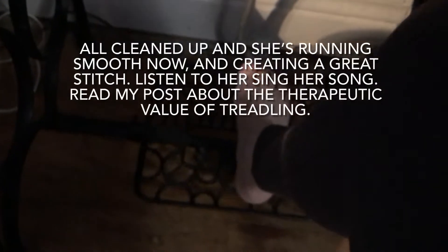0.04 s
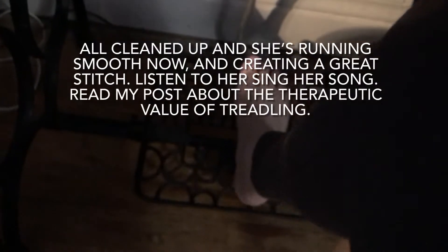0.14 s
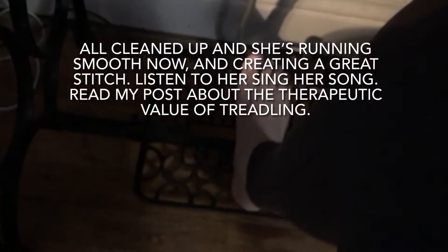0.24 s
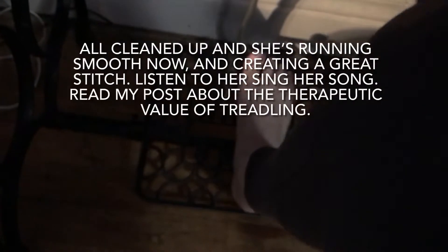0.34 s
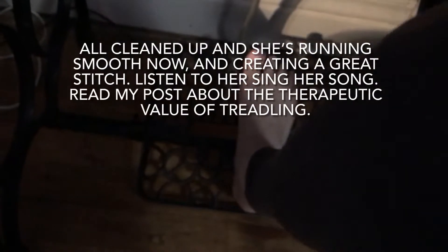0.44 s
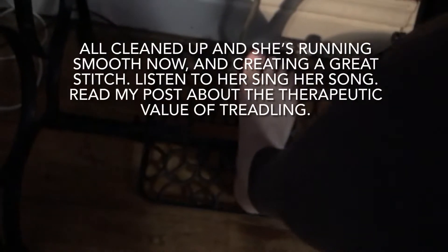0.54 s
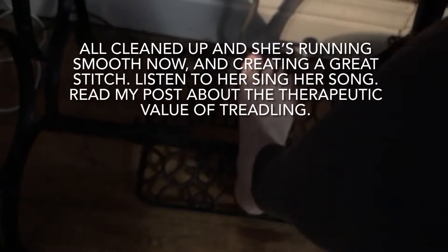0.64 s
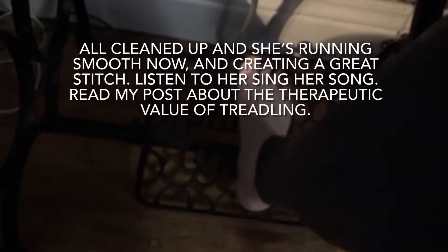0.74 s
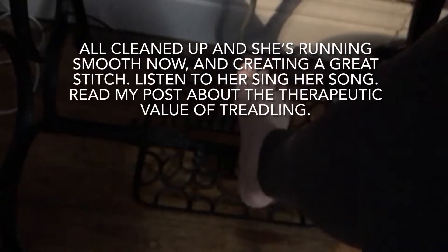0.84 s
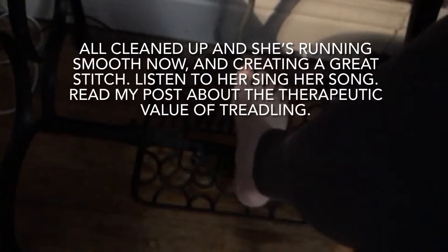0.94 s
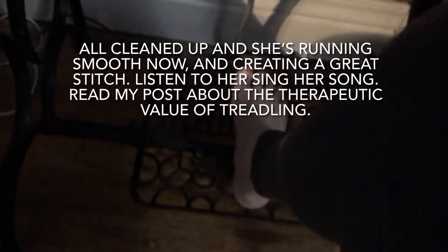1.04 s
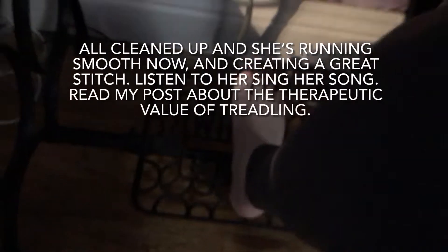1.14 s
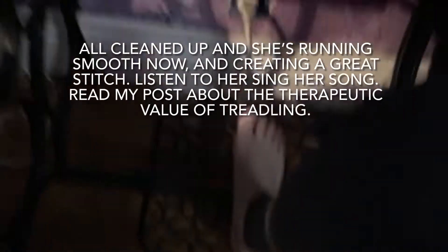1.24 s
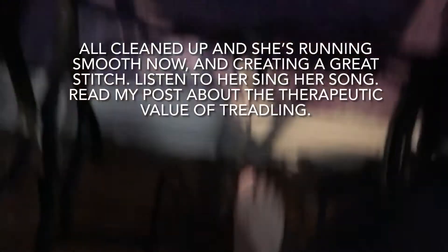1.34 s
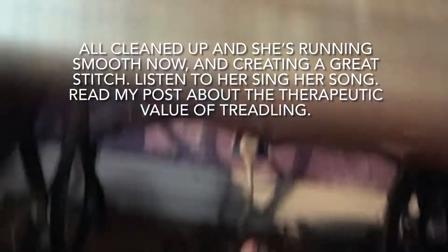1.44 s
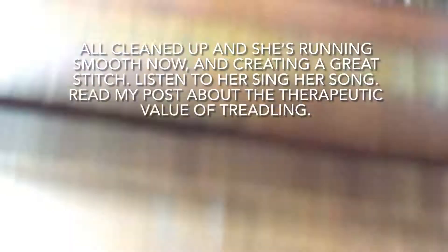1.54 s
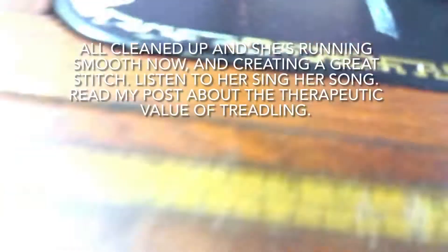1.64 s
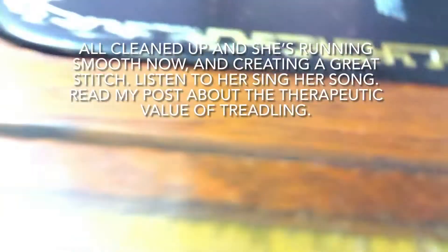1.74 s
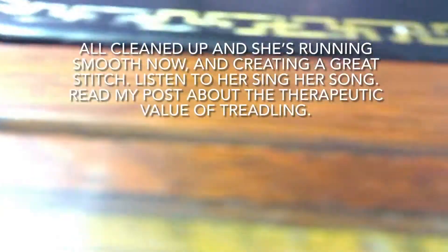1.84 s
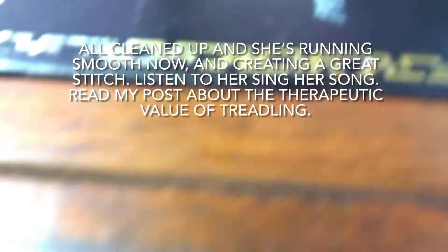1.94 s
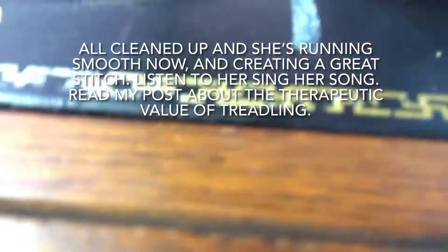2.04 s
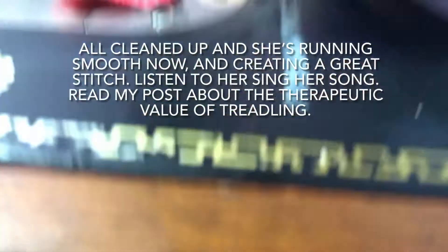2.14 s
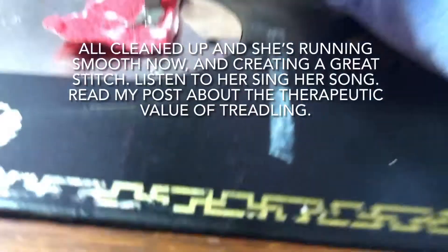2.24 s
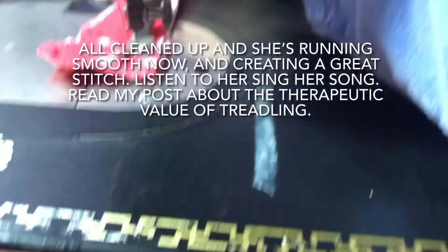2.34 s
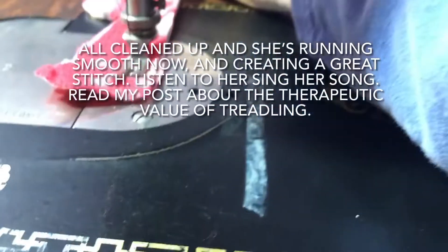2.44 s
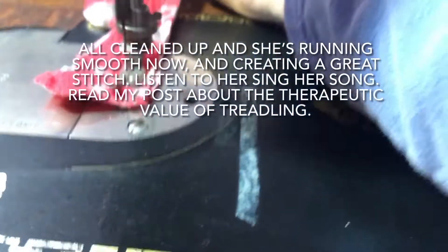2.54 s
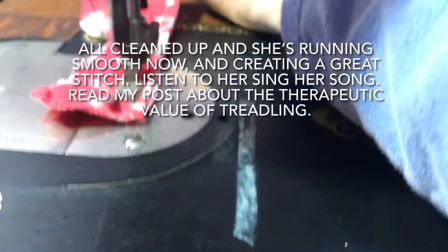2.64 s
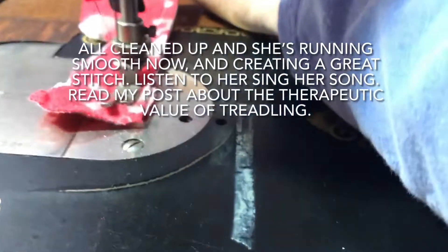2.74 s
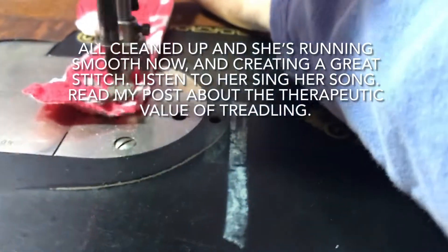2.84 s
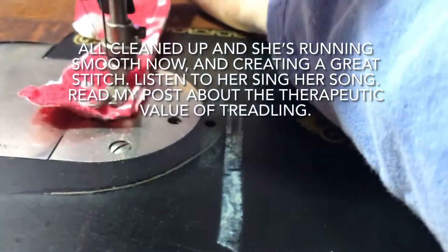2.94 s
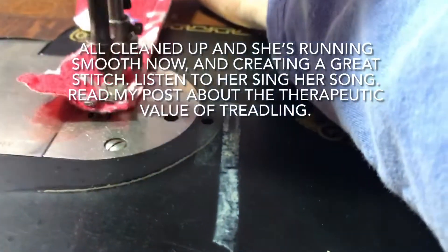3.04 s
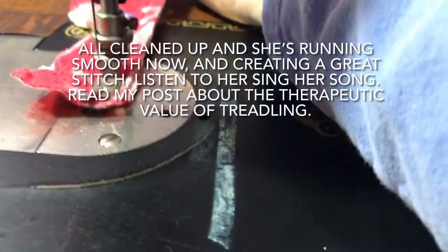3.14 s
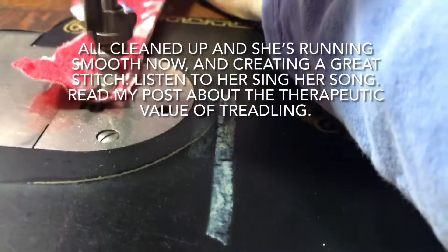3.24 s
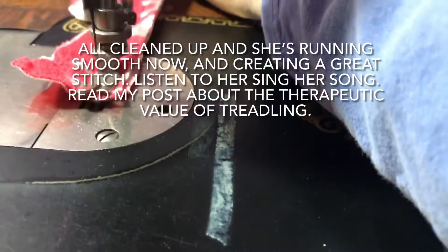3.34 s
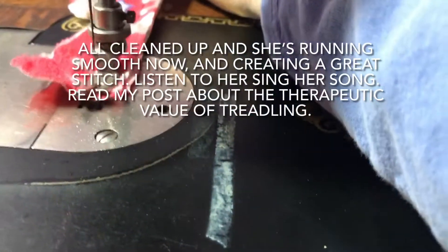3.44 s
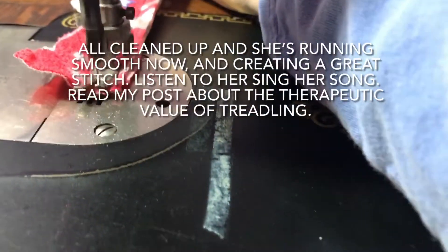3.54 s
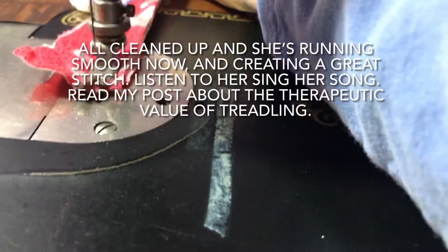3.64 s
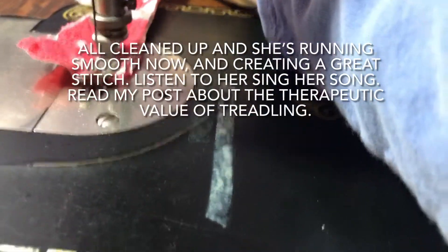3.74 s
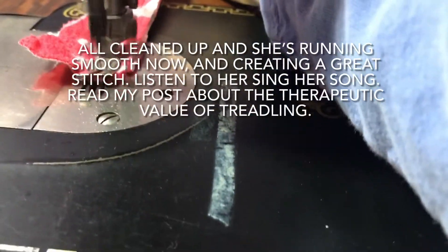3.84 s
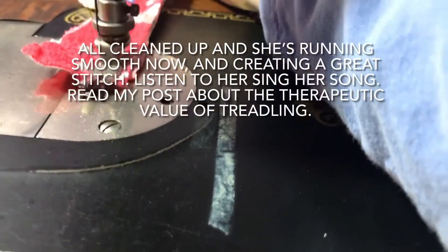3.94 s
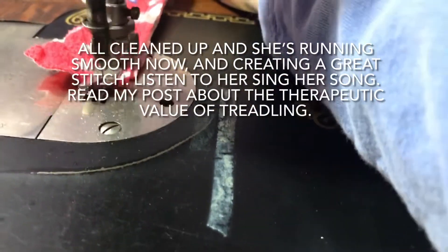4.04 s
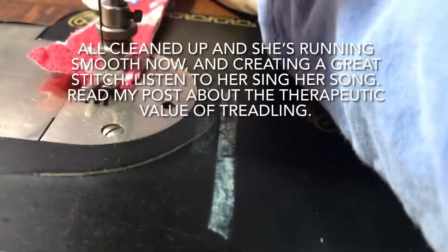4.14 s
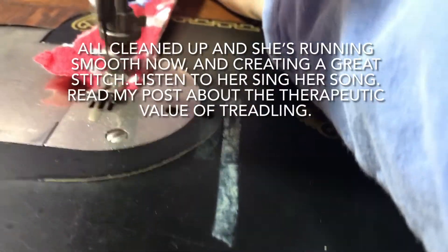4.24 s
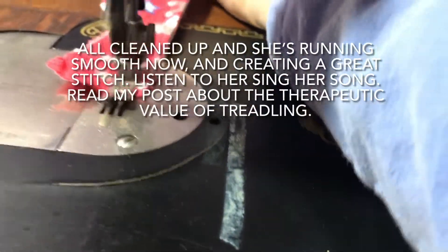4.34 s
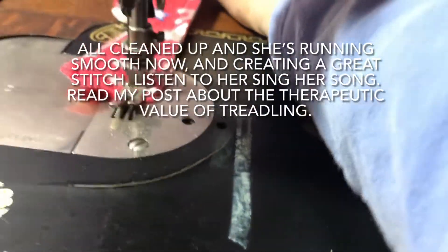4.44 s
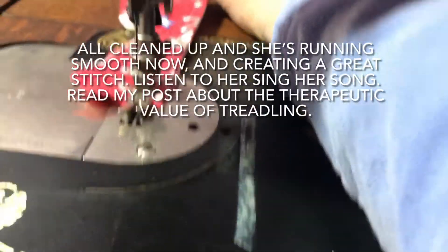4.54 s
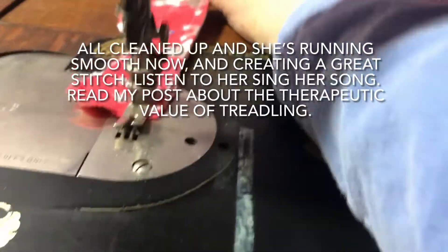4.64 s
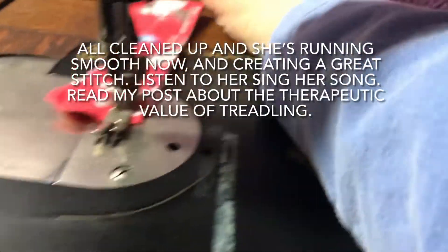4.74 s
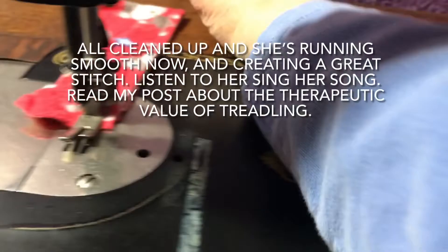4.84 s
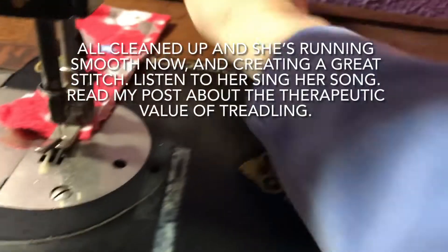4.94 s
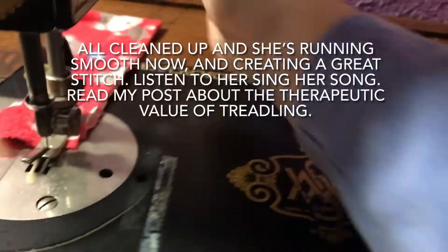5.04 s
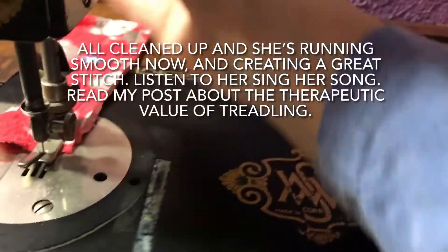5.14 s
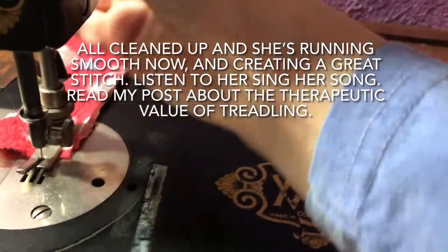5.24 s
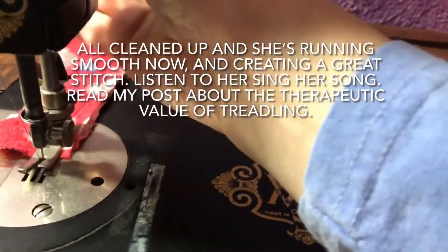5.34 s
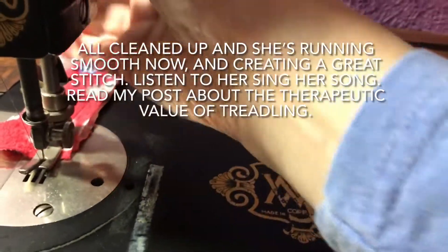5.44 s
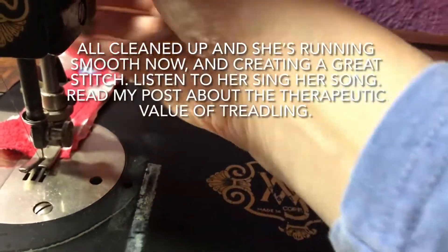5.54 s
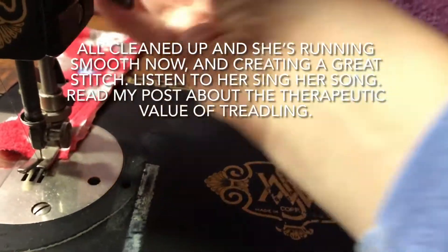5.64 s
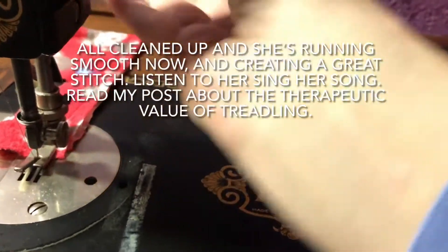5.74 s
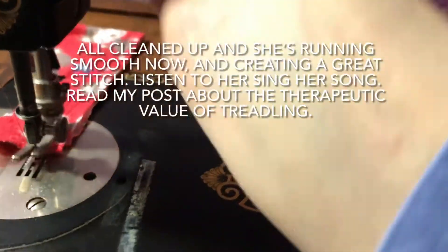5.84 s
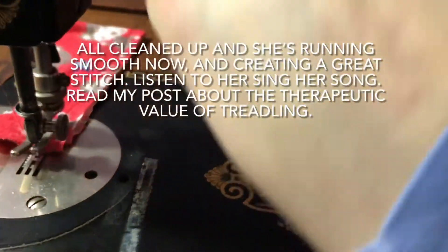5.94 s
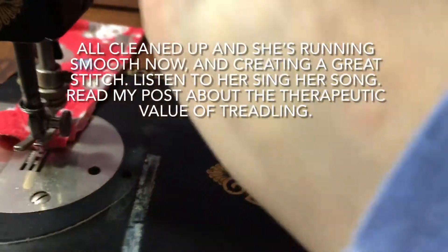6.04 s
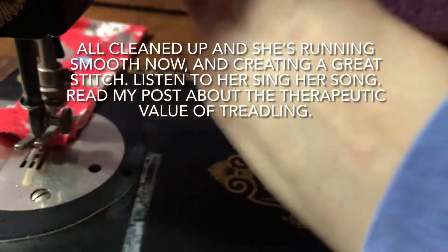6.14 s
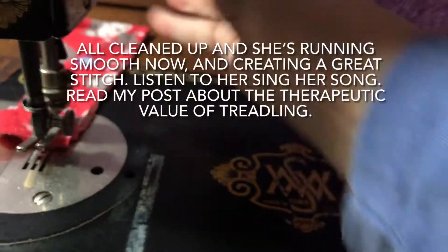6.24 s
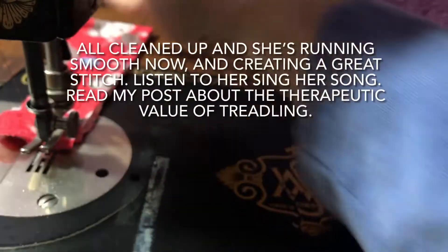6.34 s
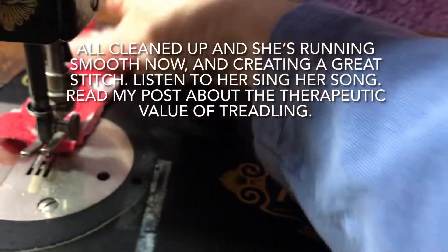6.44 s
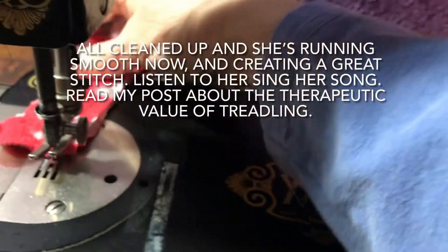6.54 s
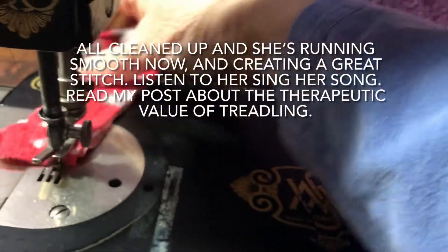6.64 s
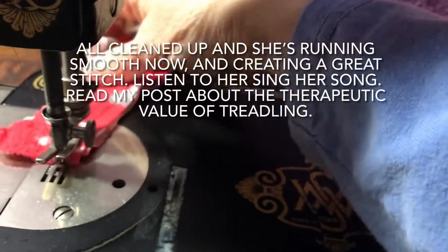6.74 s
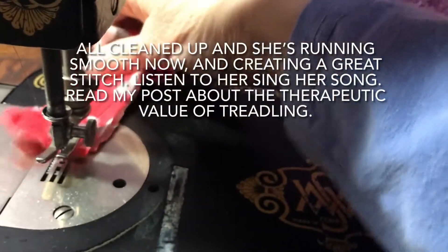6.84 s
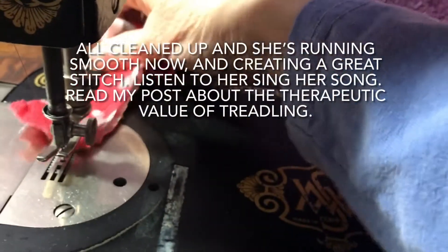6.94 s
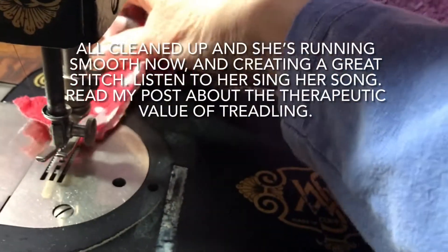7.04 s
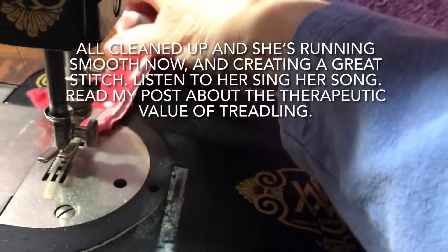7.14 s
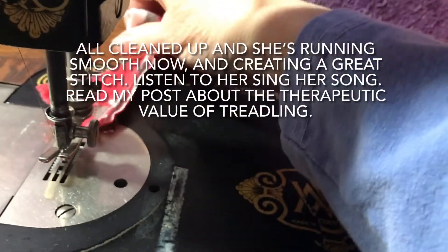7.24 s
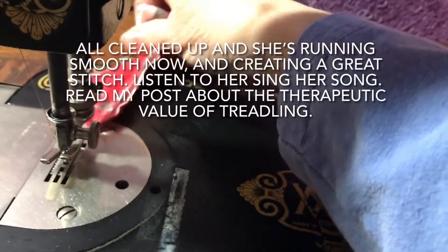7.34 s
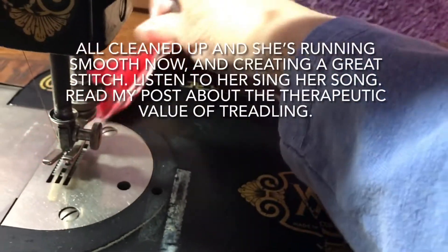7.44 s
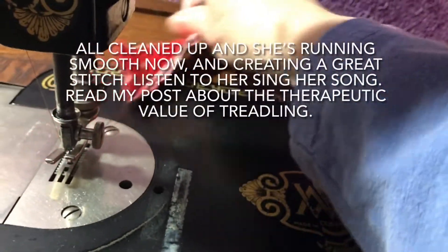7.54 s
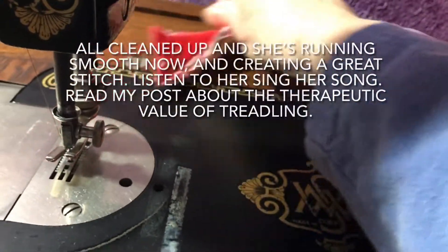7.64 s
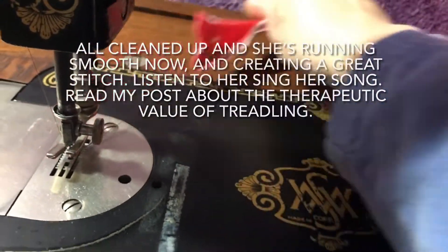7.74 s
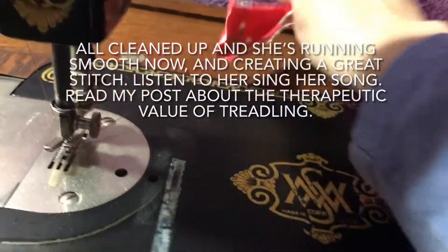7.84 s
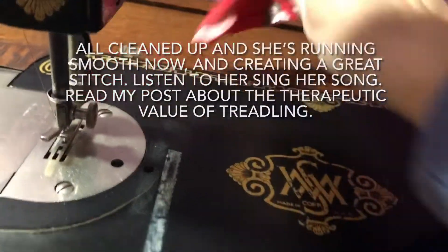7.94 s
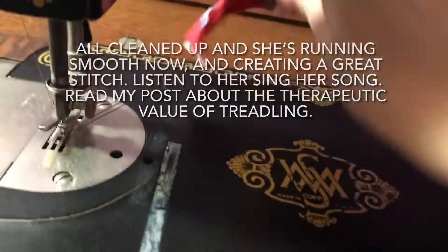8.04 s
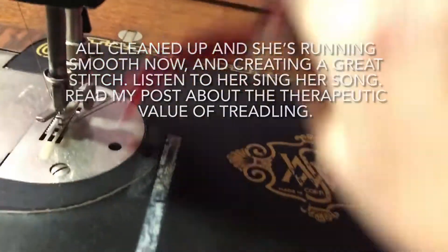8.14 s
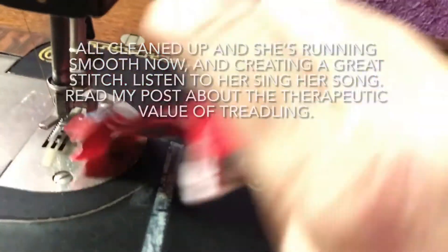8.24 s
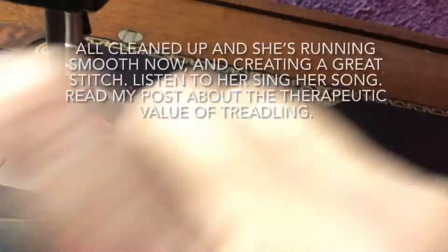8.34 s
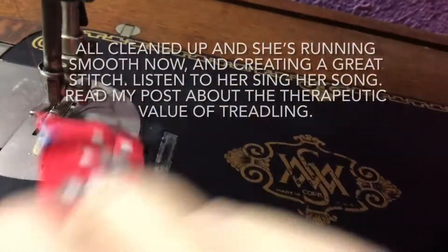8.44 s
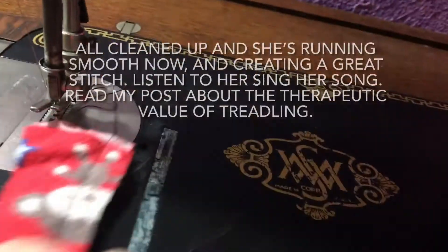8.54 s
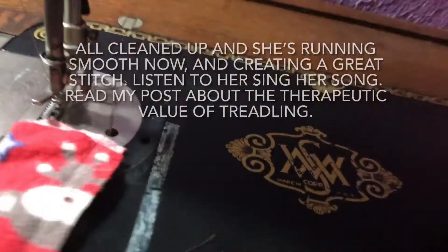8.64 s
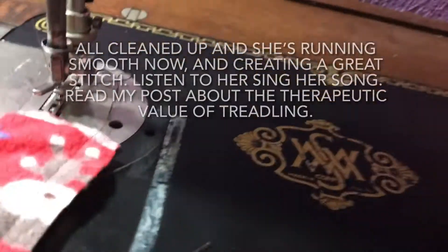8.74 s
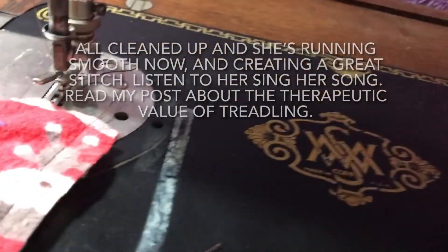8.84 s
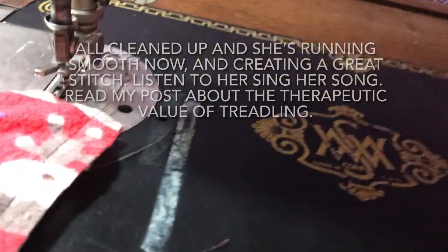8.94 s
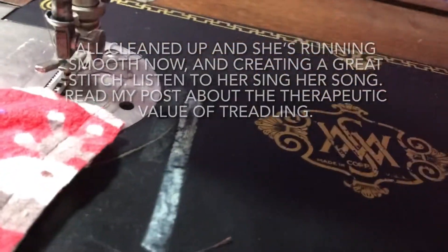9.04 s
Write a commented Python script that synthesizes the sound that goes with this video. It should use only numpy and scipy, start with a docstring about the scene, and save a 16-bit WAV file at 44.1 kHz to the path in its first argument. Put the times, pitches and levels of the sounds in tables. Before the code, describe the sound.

Close, handheld microphone moving from beneath a wooden table to above it. A mechanical sewing machine clatters in quick even cycles, with knocking wood, metallic clicks and sliding hiss, first muffled, then crisp and louder. After some four and a half seconds it coasts to rest with a soft thump. In the quiet, a low compressor hum remains; a lever snaps twice, fabric scrapes over metal, thread crackles and ticks, then only faint rubbing.

```python
"""A treadle sewing machine runs at about four stitches a second in a small room, over a compressor's hum.
The microphone is under the wooden table at first, then rises above it: each turn repeats clacks of steel
links and one rattle of the shuttle, while the table knocks and rumbles. The machine coasts to a stop, hands
draw cloth and ticking thread from under the foot, and the presser-foot lever snaps twice meanwhile.
Noise bursts and rubbing noise ring filtered bodies; sagging sines make the thuds, steady sines the hum."""
import sys
import numpy as np
from scipy import signal
from scipy.fft import rfft, irfft
from scipy.io import wavfile
from scipy.ndimage import uniform_filter1d

SR = 44100
rng = np.random.default_rng(int(sys.argv[2]) if len(sys.argv) > 2 else 0)


def waveform_to_disk(signal):
    """Save audio, clipped to [-1, 1], as 16-bit WAV at the path in sys.argv[1]."""
    frames = np.transpose(np.atleast_2d(signal))
    scaled = np.clip(frames, -1, 1) * 32767
    samples = np.round(scaled).astype(np.int16)
    wavfile.write(sys.argv[1], SR, samples)


N = 399987
T = np.arange(N) / SR  # s


def undb(db):
    """Decibels to gain."""
    return 10 ** (np.asarray(db) / 20)


def unit(x):
    """Scale to rms 1."""
    return x / np.sqrt(np.mean(x ** 2))


def add(out, s, sound):
    """Mix a sound in at time s, or at the start if s is negative."""
    i = max(int(s * SR), 0)
    out[i:i + len(sound)] += sound[:max(N - i, 0)]


def during(span, size=1000):
    """1 within a span of time, 0 outside, with soft edges."""
    inside = (T > span[0]) & (T < span[1])
    return uniform_filter1d(1. * inside, size=size)


def body(colour, modes=(), size=4096):
    """Causal (minimum-phase) impulse response of a broad colour with resonances standing out of it."""
    f = np.maximum(np.fft.rfftfreq(size, 1 / SR), 1)
    points = np.array(colour)
    db = np.interp(np.log(f), np.log(points[:, 0]), points[:, 1])
    for hz, width, lift_db in modes:
        peak = (undb(lift_db) ** 2 - 1) / (1 + (2 * (f - hz) / width) ** 2)
        db = db + 10 * np.log10(1 + peak)
    # folding the cepstrum onto positive times makes the response causal
    cepstrum = irfft(np.log(undb(db)))
    cepstrum[1:size // 2] *= 2
    cepstrum[size // 2 + 1:] = 0
    return irfft(np.exp(rfft(cepstrum)))[:size // 2]


def through(x, response):
    """Let a signal ring a body."""
    return signal.fftconvolve(x, response)[:len(x)]


def contact(response, lift_db=11, count=4):
    """Parts never meet twice at the same spot, so each contact brings out a few resonances of its own."""
    pitches = np.geomspace(1100, 15000, 200)[rng.integers(200, size=count)]
    modes = [(hz, hz / 14, lift_db) for hz in pitches]
    spot = body([(100, 0), (16000, 0)], modes, size=256)
    return np.convolve(response, spot)


def blow(response, rise_s, decay_s, rattle_db, rattle_s, grain_db=4, size=4096, count=176):
    """A burst of tiny contacts with an uneven rattle of loose parts; its loudest 4 ms have rms 1."""
    t = np.arange(size) / SR
    bounces = undb(grain_db * np.repeat(rng.standard_normal(size // 32), 32))
    rattle = undb(rattle_db) * bounces * np.exp(-t / rattle_s)
    force = (1 - np.exp(-(t / rise_s) ** 2)) * (np.exp(-t / decay_s) + rattle)
    y = through(force * rng.standard_normal(size), response)
    return y / np.sqrt(uniform_filter1d(y ** 2, count).max())


def thud(hz, rise_s, decay_s, drop, overtone_db=-60, size=12000):
    """A soft push on one damped mode, whose pitch sags as the contact relaxes; rubbing adds overtones."""
    t = np.arange(size) / SR
    swell = (1 - np.exp(-(t / rise_s) ** 2)) * np.exp(-t / decay_s)
    swell = swell / swell.max()
    sagging_hz = hz * (1 + drop * (np.exp(-t / decay_s / 2) - .5))
    phase = 2 * np.pi * np.cumsum(sagging_hz) / SR
    overtones = np.sin(2 * phase) + np.sin(3 * phase) / 2
    return swell * np.sin(phase) + undb(overtone_db) * swell ** 2 * overtones


def friction(response, grain_db, grain_hz):
    """Rubbing: noise whose strength wanders from one catch to the next, ringing a body."""
    catches = np.interp(T * grain_hz, np.arange(N), rng.standard_normal(N))
    return unit(through(rng.standard_normal(N) * undb(grain_db * catches), response))


def crackle(response, rate_hz, spread_db, size=300):
    """Tiny catches of very uneven size, each a brief scratch that rings a body."""
    hits = (rng.random(N) < rate_hz / SR) * rng.choice([-1, 1], N)
    catches = hits * undb(spread_db * np.minimum(rng.standard_normal(N), 2))
    scratch = rng.standard_normal(size) * np.exp(-np.arange(size) / SR / .0014)
    return unit(through(catches, np.convolve(response, scratch)))


# one turn of the handwheel per stitch; the pace swings with the treadle, the last turn is left unfinished:
# (shuttle swing [s], feed drop [s], shuttle relative level [dB], force on the steel [dB],
#  force on the table [dB], groan relative level [dB])
STITCHES = [(-.08, 0.09, -32, 4, 2, -32.5), (0.152, 0.3267, -25, -1.5, 1.5, -38),
            (.3806, 0.5752, -26, 1, 0.5, -32), (0.643, 0.8326, -30.5, 1, 0.5, -49),
            (.874, 1.013, -26.5, 2.5, 3, -34), (1.06, 1.2232, -27, -1.5, 1, -38),
            (1.277, 1.459, -27, 1.5, 1.5, -39), (1.5254, 1.741, -28.5, 0, -1.5, -50),
            (1.7958, 1.952, -18.5, -0.5, 2.5, -24.5), (1.9945, 2.1464, -21.5, 1, 3.5, -23.5),
            (2.2053, 2.38, -20, 0, 0.5, -26), (2.4347, 2.643, -22.5, 0, 0, -53),
            (2.7078, 2.8888, -26.5, -0.5, -1, -26.5), (2.9379, 3.0884, -21.5, -0.5, 1, -22),
            (3.1446, 3.3283, -21, -2.5, -2, -46), (3.383, 3.578, -20.5, -2, 0.5, -24.5),
            (3.6616, 3.8663, -29, -0.5, 0.5, -49), (3.918, 4.0885, -20.5, -1, -1, -27),
            (4.146, 4.347, -24.5, -2, -1, -35.5), (4.438, 4.858, -30.5, -12, -9.5, -50)]
FEED_TURN = .76  # share of the turn


def turn_marks():
    """Times and handwheel angles (in turns) of every shuttle swing and feed drop."""
    times = [s for row in STITCHES for s in row[:2]]
    turns = [k + share for k in range(len(STITCHES)) for share in (0, FEED_TURN)]
    return times, turns


def time_of(turn):
    """The moment at which the handwheel reaches an angle."""
    times, turns = turn_marks()
    return np.interp(turn, turns, times)


def near_turn(turn, share, width):
    """A bell that reaches 1 whenever the handwheel passes a given share of its turn."""
    return np.exp(-(((turn - share + .5) % 1 - .5) / width) ** 2)


# the microphone starts under the table and rises above it: (from [s], to [s])
RISE_S = (1.32, 1.695)
# while it is below, the table top screens clacks, chatter, hiss and rub, and the frame's rumble is nearer [dB]
SCREEN_STEEL_DB, SCREEN_TABLE_DB, SCREEN_TICK_DB, SCREEN_HISS_DB = -11.5, -4.5, -15.5, -3.5
SCREEN_RUB_DB, NEAR_RUMBLE_DB = -20, 1.5


def under_table(s):
    """1 while the microphone is under the table, 0 once it is above."""
    return np.interp(s, RISE_S, (1, 0))


# colour of the soft room noise: (frequency [Hz], relative level [dB])
AIR = [(25, -26), (42, -2), (60, -18), (92, -19.5), (134, -9.5), (175, -21.5), (217, -18.5), (363, -8),
       (451, -23), (775, -26.5), (1040, -30), (2000, -32.5), (4870, -45), (16000, -42)]
AIR_DB = -56.5  # dB rms
SHAFT_HZ = 45.12
# compressor orders: (multiple of the shaft rate [1], level [dB rms])
COMPRESSOR = [(1, -54), (2, -73), (3, -65), (4, -76), (5, -61), (6, -67.5), (7, -70), (8, -62), (9, -71.5),
              (11, -74.5), (12, -77.5), (15, -75)]
# mains hum: (frequency [Hz], level [dB rms])
MAINS = [(60, -71), (120, -69), (240, -74), (300, -70)]


def background():
    """A compressor's slightly wavering shaft orders beat against mains hum, over soft room noise."""
    waver = np.interp(T, np.arange(12), rng.standard_normal(12))
    turns = np.cumsum(SHAFT_HZ + .04 * waver) / SR
    lines = [(k * turns, db) for k, db in COMPRESSOR] + [(hz * T, db) for hz, db in MAINS]
    hum = 0
    for cycles, db in lines:
        hum = hum + np.sqrt(2) * undb(db) * np.sin(2 * np.pi * (cycles + rng.random()))
    return hum + undb(AIR_DB) * unit(through(rng.standard_normal(N), body(AIR)))


# resonances that stand out of the machine's body: (frequency [Hz], width [Hz], lift [dB])
MACHINE_MODES = [(331.7, 24, 8), (603, 25, 5), (707, 22, 7), (1220, 78, 3), (1615, 60.6, 6), (2785, 130, 8),
                 (3290, 130, 5), (4200, 520, 2), (6080, 320, 5.5), (6870, 240, 1.5), (7960, 205, 3.5),
                 (8685, 300, 2.5), (9500, 370, 2.5), (11170, 150, 1), (11600, 400, 6.5)]
# colours of rumbling frame, table top, sliding metal and rubbing rod: (frequency [Hz], relative level [dB])
RUMBLE = [(30, -21), (70, -5), (130, -0.5), (190, 0), (320, -1.5), (420, -6.5), (600, -11), (1500, -41)]
TABLE = [(100, -15.5), (300, -21), (470, -3), (650, 3.5), (950, -4.5), (1300, -4), (1800, -17), (2600, -19),
         (6000, -57)]
SLIDE = [(700, -14), (1800, -3), (3000, 2.5), (5000, -5.5), (9000, -6.5), (16000, -26)]
RUB = [(200, -51), (480, -13), (680, -3), (900, -14), (2500, -45)]
# wooden resonances of the drive rod: (frequency [Hz], width [Hz], lift [dB])
RUB_MODES = [(592, 35, 18), (699, 48, 6.5)]
# relative levels [dB]; the jiggle of small parts is relative to sliding metal of rms 1, before screening
RUMBLE_DB, CHATTER_DB, RUB_DB, HISS_DB, JIGGLE_DB = -53, -49, -47.5, -59.5, -57
# the load swells once a turn: share of the turn, width [turns], lift [dB]
LOAD_TURN, LOAD_WIDTH, LOAD_DB = 0.6, 0.25, 5
# the shuttle slides in its race after each swing, raising hiss and jiggle: share, width [turns], lift [dB]
RACE_TURN, RACE_WIDTH, RACE_DB = 0.21, 0.24, 3.5
# the feet stop pushing and the gear dies away: from [s], fall [dB per s]
COAST_S, COAST_DB_PER_S = 4.2, 25


def gear():
    """Frame rumble, bearing chatter and rod rub follow the load; slides hiss and small parts jiggle."""
    turn, under = np.interp(T, *turn_marks()), under_table(T)
    table_force_db = [row[4] for row in STITCHES]
    force = undb(np.interp(turn, np.arange(len(STITCHES)) + .5, table_force_db))
    load = near_turn(turn, LOAD_TURN, LOAD_WIDTH)
    race = near_turn(turn, RACE_TURN, RACE_WIDTH)
    running = undb(-COAST_DB_PER_S * np.maximum(T - COAST_S, 0))

    rumble = friction(body(RUMBLE, MACHINE_MODES), grain_db=4, grain_hz=60.5)
    rumble = undb(RUMBLE_DB + NEAR_RUMBLE_DB * under) * rumble
    chatter = friction(body(TABLE, MACHINE_MODES), grain_db=2.5, grain_hz=202.2)
    chatter = undb(CHATTER_DB + SCREEN_TABLE_DB * under) * chatter
    rub = friction(body(RUB, RUB_MODES), grain_db=2.5, grain_hz=49.7)
    rub = undb(RUB_DB + SCREEN_RUB_DB * under) * rub
    loaded = force * (undb(LOAD_DB * load) * (rumble + chatter) + load * rub)

    slides = body(SLIDE, MACHINE_MODES)
    hiss = undb(HISS_DB) * friction(slides, grain_db=2.0, grain_hz=316)
    # six loose parts, each with its own ring
    jiggle = unit(sum(crackle(contact(slides), rate_hz=28, spread_db=3.5) for _ in range(6)))
    sliding = hiss + undb(JIGGLE_DB) * jiggle
    return running * (loaded + undb(SCREEN_HISS_DB * under + RACE_DB * race) * sliding)


# needle bar, take-up, feed and links clack at the same points of every turn: (share of the turn [1],
# steel ring relative level [dB], table knock relative level [dB], bright tick relative level [dB])
CLACKS = [(.128, -29, -31, -40), (.232, -30, -32, -32), (.298, -25, -33, -39.5), (.41, -31, -36.5, -40),
          (.59, -30, -38.5, -39), (.76, -27.5, -37, -31.5), (.905, -27.5, -39, -46.5)]
# scatter of a clack from turn to turn, in time [s] and strength [dB]; no clack falls after the stop [s]
PLAY_S, PLAY_DB, STOP_S = .002, 1.24, 4.63


def strokes():
    """The clacks of all turns, a little early or late, weak or strong: (s, steel dB, table dB, tick dB)."""
    rows = []
    for k, (_, _, _, steel_force_db, table_force_db, _) in enumerate(STITCHES):
        force_db = np.array([steel_force_db, table_force_db, steel_force_db])
        for share, *levels_db in CLACKS:
            chance = rng.standard_normal(4)
            # the feed drop keeps its exact time
            s = time_of(k + share) + PLAY_S * chance[0] * (share != FEED_TURN)
            screen_db = under_table(s) * np.array([SCREEN_STEEL_DB, SCREEN_TABLE_DB, SCREEN_TICK_DB])
            if 0 < s < STOP_S:
                rows.append((s, *(np.array(levels_db) + force_db + screen_db + PLAY_DB * chance[1:])))
    return rows


# now and then the slack in the drive is taken up with a jerk; the row at 4.565 s is instead a clack of # the
# slowing last turn: (time [s], steel ring relative level [dB], table knock relative level [dB], # bright tick
# relative level [dB])
JERKS = [(0.76, -27, -25, -43), (1.6563, -20.5, -21.5, -29.5), (1.9071, -24, -21.5, -23),
         (2.0172, -21.5, -30.5, -39), (2.548, -21, -22, -31.5), (3.2794, -26, -28, -33.5),
         (3.7857, -19.5, -20.5, -24.5), (4.0464, -24.5, -37, -31), (4.565, -32, -46, -34),
         (4.6864, -25, -32, -34)]
# colours of the steel head and of the contact's tick: (frequency [Hz], relative level [dB])
STEEL = [(600, -35.5), (1400, -1), (2100, -8), (3000, 2), (4300, 1), (5500, -11.5), (9000, -22)]
TICK = [(1500, -34.5), (4000, -14), (5500, -3), (8000, 1), (10500, -1.5), (13500, -0.5), (16000, -5)]


def linkage():
    """Each clack or jerk ticks at the contact, rings the steel head and knocks the table top."""
    out = np.zeros(N)
    steel, table, tick = (body(c, MACHINE_MODES) for c in (STEEL, TABLE, TICK))
    for s, steel_db, table_db, tick_db in JERKS + strokes():
        click = blow(contact(tick, lift_db=9), rise_s=0.0014, decay_s=0.0032, rattle_db=-12, rattle_s=0.015)
        ring = blow(contact(steel, lift_db=8), rise_s=0.00031, decay_s=0.0088,
                    rattle_db=16.0, rattle_s=0.0072)
        knock = blow(contact(table), rise_s=0.002, decay_s=0.0079, rattle_db=-19.5, rattle_s=0.038)
        add(out, s, undb(tick_db - 3.5) * click)
        add(out, s, undb(steel_db - 11.5) * ring)
        add(out, s, undb(table_db - 4.0) * knock)
    return out


# the wooden drive rod groans once a turn: share of the turn, nominal pitch [Hz], relative pitch scatter
GROAN_TURN, GROAN_HZ, GROAN_SCATTER = .42, 693, 0.01
# dull bumps and knocks of treadle and cabinet: (time [s], relative level [dB], nominal pitch [Hz])
BUMPS = [(0.047, -20.5, 383), (0.06, -28, 85), (0.444, -20.5, 384), (0.765, -21, 324), (1.1, -24.5, 344),
         (1.384, -24, 317), (1.44, -20.5, 381), (1.663, -25, 362), (1.89, -13, 666), (1.919, -29, 348),
         (2.099, -20.5, 127), (2.469, -23, 338), (2.864, -18.5, 703), (3.557, -24.5, 347),
         (3.808, -22.5, 350), (3.834, -22, 622), (4.254, -27, 640), (5.644, -30, 122.8),
         (6.333, -27.5, 241)]
# the treadle rocks to rest: (time [s], level [dB])
ROCKING = [(4.776, -33), (4.87, -44), (4.97, -46)]
# the hand and the lever jolt the table top: (time [s], relative level [dB])
JOLTS = [(5.257, -41), (5.480, -41), (5.642, -47), (5.910, -28), (6.111, -32), (6.665, -47.5),
         (7.988, -56.5), (8.624, -51)]
# colour of the table top when jolted: (frequency [Hz], relative level [dB])
WOOD = [(100, -15.5), (300, 4), (520, -3), (800, -7), (1300, -16), (2500, -26), (6000, -47)]
# resonances of the table top: (frequency [Hz], width [Hz], lift [dB])
TOP_MODES = [(340, 20, 7.5), (543, 45, 18), (885, 120, 8.5), (1310, 40, 6)]


def cabinet():
    """Groans, bumps and the settling treadle push damped wooden modes; jolts ring the table top."""
    out, top = np.zeros(N), body(WOOD, TOP_MODES)
    for k, (*_, db) in enumerate(STITCHES):
        hz = GROAN_HZ * (1 + GROAN_SCATTER * rng.standard_normal())
        groan = thud(hz, rise_s=0.0055, decay_s=0.01, drop=0.083, overtone_db=-10.0)
        add(out, time_of(k + GROAN_TURN), undb(db - 3.0) * groan)
    for s, db, hz in BUMPS:
        add(out, s, undb(db - 11.0) * thud(hz, rise_s=0.0029, decay_s=0.0088, drop=0.063))
    for s, db in ROCKING:
        add(out, s, undb(db) * thud(hz=55, rise_s=0.018, decay_s=0.024, drop=0.44, overtone_db=-10.0))
    for s, db in JOLTS:
        jolt = blow(top, rise_s=0.0016, decay_s=.014, rattle_db=-9, rattle_s=0.046, size=8192)
        add(out, s, undb(db - 2.5) * jolt)
    return out


# colour of the shuttle's carrier: (frequency [Hz], relative level [dB])
RATTLE = [(300, -35.5), (900, -4.5), (1600, -3.5), (2300, -10), (3100, 3), (3700, -7.5), (5000, -12.5),
          (8000, -16), (16000, -20.5)]


def shuttle():
    """At the end of each swing the shuttle bounces a few times in its carrier, each bounce weaker."""
    out, carrier = np.zeros(N), body(RATTLE, MACHINE_MODES)
    for s, _, db, *_ in STITCHES[1:]:
        for bounce in range(4):
            late_s = bounce * (.0075 + .0008 * rng.standard_normal())
            hit = blow(carrier, rise_s=0.00088, decay_s=0.009, rattle_db=-20.0, rattle_s=0.038)
            add(out, s + late_s, undb(db - 8.5 - 8.2 * bounce) * hit)
    return out


# fabric and thread scrape in pulls: (time [s], length [s], relative level [dB])
SCRAPES = [(4.683, 0.44, -62.5), (5.733, 0.41, -64.5), (6.484, 0.079, -63), (6.606, 0.086, -48),
           (6.78, 0.2, -58), (7.05, 0.11, -55), (7.31, 0.51, -50), (7.52, 0.4, -55), (7.685, 0.1, -46),
           (7.789, 0.041, -45), (7.925, 0.14, -66), (8.45, .1, -73), (8.597, 0.3, -70)]
# cloth and thread slide under the hands: (from [s], to [s]), resting relative level [dB]
HANDS_S, HANDS_DB = (4.75, 8.95), -72
# the thread is drawn through the tension spring: (from [s], to [s])
PULL_S = (6.85, 7.85)
# the taut thread catches and slips: catches per s, depth [dB]
SLIP_HZ, SLIP_DB = 45.05, 2
# colour of dragged fabric: (frequency [Hz], relative level [dB])
FABRIC = [(200, -14), (600, 8), (1000, 1), (1500, 4), (2200, -3), (3500, -3), (6000, -4.5), (10000, -7.5),
          (16000, -13)]
# resonances of the needle plate: (frequency [Hz], width [Hz], lift [dB])
PLATE_MODES = [(690, 57, 7.6), (1546, 240, 1.5), (3360, 160, 5), (4010, 300, 4), (5660, 280, 2.5)]


def cloth():
    """Fabric drags over the needle plate, at times in firmer pulls; the taut thread slips and crackles."""
    drag = undb(HANDS_DB) * during(HANDS_S)
    for s, length_s, db in SCRAPES:
        add(drag, s, undb(db) * signal.windows.tukey(int(length_s * SR), .8))
    taut = during(PULL_S)
    catches = np.interp(T * SLIP_HZ, np.arange(N), rng.standard_normal(N))
    slips = undb(SLIP_DB * taut * catches)
    fabric = friction(body(FABRIC), grain_db=2, grain_hz=302)
    thread = crackle(body(SLIDE, PLATE_MODES), rate_hz=220, spread_db=6)
    # the fabric is quieter while the thread is taut
    return drag * slips * (fabric * undb(-4 * taut) + undb(-7.0) * taut * thread)


# lighter tugs at the thread: steel ring, table knock, bright tick, mean relative levels [dB]
TUG_DB = (-42, -53, -65)


def tugs(spread_db, count=18):
    """Light catches of the thread, scattered over the pull: (s, steel dB, table dB, tick dB)."""
    times = np.interp((np.arange(count) + rng.random(count)) / count, (0, 1), PULL_S)
    return [(s, *(np.array(TUG_DB) + spread_db * rng.standard_normal(3))) for s in times]


# the clearest ticks of thread and tension parts as the work is handled: (time [s],
# steel ring relative level [dB], table knock relative level [dB], bright tick relative level [dB])
TICKS = [(4.7678, -42, -39.5, -56), (5.4774, -44.5, -46, -75), (5.6393, -29.5, -33, -45.5),
         (5.8237, -49, -47, -55.5), (6.6072, -43, -48, -48.5), (6.8927, -35, -54.5, -52.5),
         (6.9794, -37, -46, -42.5), (7.1232, -39, -43, -69), (7.1496, -34.5, -53, -52),
         (7.2546, -31.5, -45, -41), (7.3234, -39, -44.5, -50.5), (7.4522, -38, -43, -47),
         (7.555, -27.5, -42, -37.5), (7.5832, -29, -46, -53), (7.7897, -24, -39, -38),
         (7.8124, -31, -39, -41), (7.9828, -43.5, -48.5, -60.5), (8.6198, -47, -45, -58)]
# the tension spring rings on after a tug: (frequency [Hz], relative level [dB], time to fall 60 dB [s])
SPRING = [(3370, 3, 0.15), (8000, 2, 0.13), (8280, -10, 0.17), (8680, 3.5, 0.11), (8940, -5, 0.14),
          (12000, 10, 0.072), (12500, -13, .1)]


def handling():
    """Light ticks at the needle plate; during the thread's pull, each also plucks the tension spring."""
    out, t = np.zeros(N), T[:SR // 2]
    steel, table, tick = (body(c, PLATE_MODES) for c in (STEEL, TABLE, TICK))
    for s, steel_db, table_db, tick_db in TICKS + tugs(spread_db=4.5):
        click = blow(contact(tick, lift_db=12.5), rise_s=.001, decay_s=.0025,
                     rattle_db=-22.5, rattle_s=0.013)
        ring = blow(steel, rise_s=0.00049, decay_s=0.0063, rattle_db=-16.5, rattle_s=.012)
        knock = blow(table, rise_s=.0012, decay_s=0.0027, rattle_db=-19.0, rattle_s=0.011)
        add(out, s, undb(tick_db - 1) * click)
        add(out, s, undb(steel_db - 13) * ring)
        add(out, s, undb(table_db - 5.5) * knock)
        if PULL_S[0] < s < PULL_S[1]:
            for hz, db, t60 in SPRING:
                pluck = np.sin(2 * np.pi * hz * t) * np.exp(-np.log(1000) * t / t60)
                add(out, s, undb(tick_db + db - 13 + 2.7 * rng.standard_normal()) * pluck)
    return out


# the presser-foot lever snaps: (time [s], steel relative level [dB], table relative level [dB],
# tick relative level [dB])
SNAPS = [(5.9014, -14.5, -13.5, -13.5), (6.1077, -28.5, -26, -30)]
# resonances of the lever: (frequency [Hz], width [Hz], lift [dB])
LEVER_MODES = [(578, 74, 6.4), (805, 40, 13), (1285, 70, 12.8), (2000, 45, 17), (3300, 75, 2.4),
               (4020, 110, 12.3), (5120, 200, 14), (5770, 200, 16), (6370, 130, 8), (6500, 130, 7.2),
               (11450, 280, 12), (11980, 160, 4.6), (12500, 400, 6)]
# colours of the snap's low, middle and top parts: (frequency [Hz], relative level [dB])
LEVER_LOW = [(100, -16.5), (300, -11), (520, 1), (850, -6.5), (1250, -0.5), (1700, -12), (2500, -7),
             (4000, -23), (9000, -46)]
LEVER_MID = [(1000, -30), (2600, -4.5), (3800, 2), (6500, -8), (8000, -2.5), (11000, -19.5)]
LEVER_TOP = [(3000, -34), (7000, -5.5), (8500, -3), (11000, 3), (13500, 0.5), (16000, -1)]


def lever():
    """The sprung lever hits its stop and buzzes against it; the presser bar and its spring rattle on."""
    out = np.zeros(N)
    low, mid, top = (body(c, LEVER_MODES) for c in (LEVER_LOW, LEVER_MID, LEVER_TOP))
    for s, steel_db, table_db, tick_db in SNAPS:
        click = blow(top, rise_s=.0016, decay_s=.0017, rattle_db=-43.5, rattle_s=0.032)
        ring = blow(mid, rise_s=0.0013, decay_s=.0023, rattle_db=-34.5, rattle_s=0.034, size=8192)
        knock = blow(low, rise_s=.0015, decay_s=0.0045, rattle_db=-30.5, rattle_s=0.029, size=8192)
        trail = blow(body(SLIDE), rise_s=0.016, decay_s=.028, rattle_db=-11.5, rattle_s=.035, size=8192)
        add(out, s, undb(tick_db + 2.0) * click)
        add(out, s, undb(steel_db + 0.5) * ring)
        add(out, s, undb(table_db - 3.5) * knock)
        add(out, s, undb(steel_db - 31.0) * trail)
    return out


def room(x, wet_low_db, wet_high_db, t60_low, t60_high, size=22050):
    """A small furnished room: a diffuse tail that dies sooner in the treble."""
    t = np.arange(size) / SR
    noise = rng.standard_normal(size) * (1 - np.exp(-(t / 0.01174) ** 2))
    low = signal.sosfilt(signal.butter(2, 2000, fs=SR, output="sos"), noise)
    low_tail = undb(wet_low_db - 60 * t / t60_low) * low
    high_tail = undb(wet_high_db - 60 * t / t60_high) * (noise - low)
    return x + through(x, low_tail + high_tail)


def scene():
    """The machine and the hands at work ring the room; the background is added without its tail."""
    near = gear() + linkage() + cabinet() + shuttle() + cloth() + handling() + lever()
    wet = room(near, wet_low_db=-37.5, wet_high_db=-45.5, t60_low=0.2, t60_high=0.09)
    return (wet + background())[None]


TOP_HZ = 16000


def record(dry):
    """The recorder rounds the sharpest peaks and cuts the top."""
    rounded = .8 * np.tanh(dry / .8)
    return signal.sosfilt(signal.ellip(8, .2, 70, TOP_HZ, fs=SR, output="sos"), rounded)


dry = scene()
out = record(dry)
waveform_to_disk(out)
```